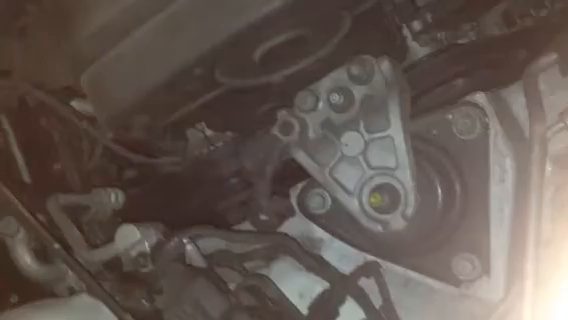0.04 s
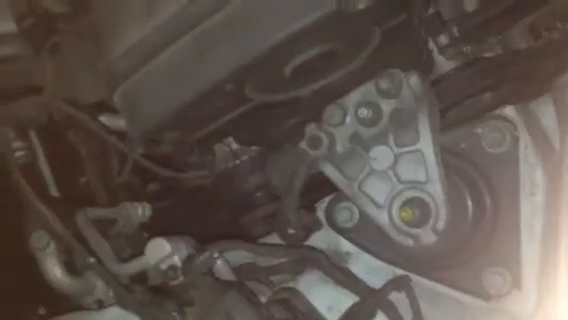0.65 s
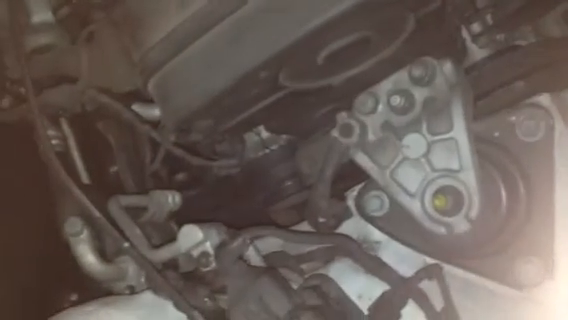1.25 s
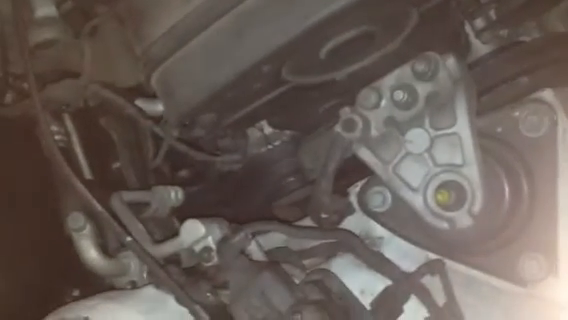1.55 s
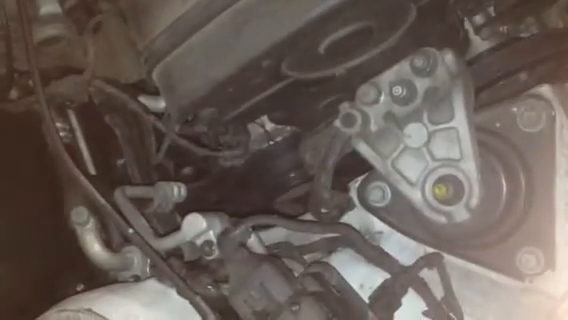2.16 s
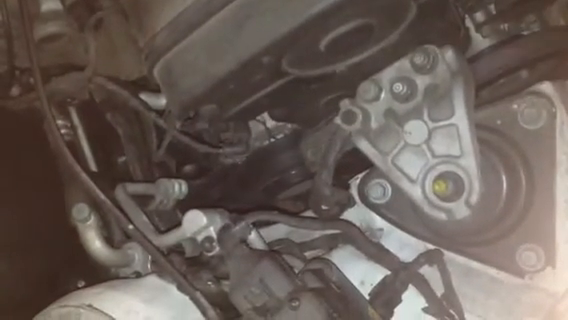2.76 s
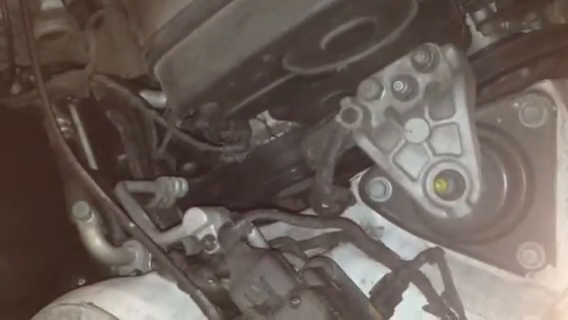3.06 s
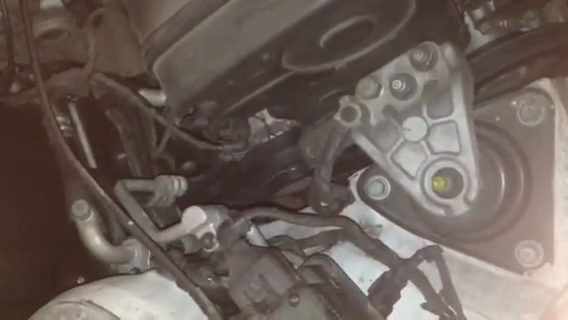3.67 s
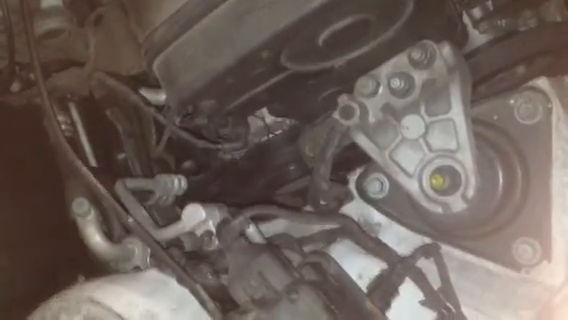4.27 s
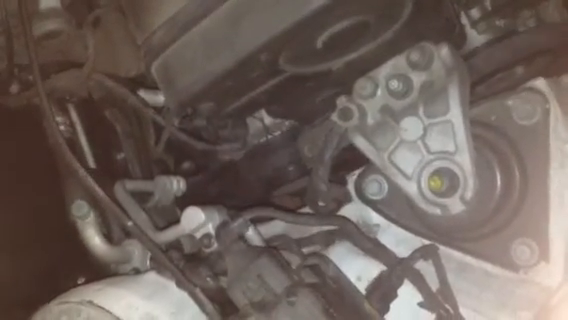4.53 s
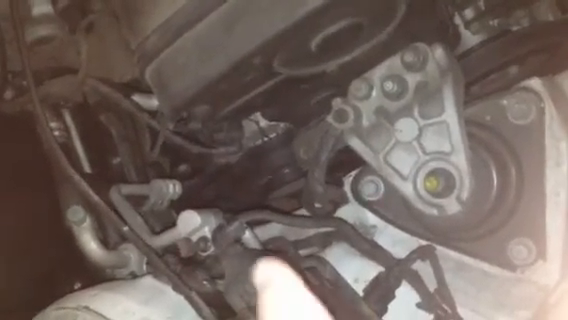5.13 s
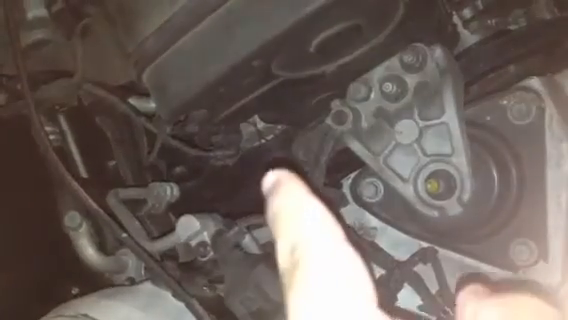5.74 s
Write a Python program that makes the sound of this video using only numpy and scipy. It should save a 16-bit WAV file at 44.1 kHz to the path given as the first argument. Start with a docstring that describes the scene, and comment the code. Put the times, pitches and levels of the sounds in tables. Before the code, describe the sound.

A four-cylinder petrol car engine idles for the whole six seconds, heard close up under an open bonnet. It makes a steady, airy rush with a low hum, light metallic knocking and quick, bright valve ticks. The speed stays even and there is little deep bass.

Above it, a drive belt slips on a pulley in very short, high chirps and squeaks, several a second at uneven intervals. Some are clean and fall in pitch; others are scratchy and sound almost like clicks. A quick cluster comes between about 0.2 and 0.5 seconds. Rougher, slightly lower squeaks recur near 1.0, 1.8, 2.7, 3.4, 4.3, 5.0 and 5.8 seconds. Quick double squeaks fall between them, around 1.3, 2.2, 2.9, 3.7, 4.5 and 5.3 seconds, with lighter chirps scattered among them. The close metal walls of the engine bay give each squeak a very short reflection.

```python
"""A drive belt slips on a pulley in short falling chirps, some clean, some harsh enough to tick.
Stick-slip friction makes each tone, and the close walls of the engine bay reflect it.
Beneath it a four-cylinder petrol engine idles under an open bonnet: belts and air rush as broadband
noise, the crank hums in harmonics of its rotation, piston blows ring the block and the valves tick."""
import sys
import numpy as np
from scipy import signal
from scipy.fft import rfft, irfft
from scipy.io import wavfile

SR = 44100
rng = np.random.default_rng(int(sys.argv[2]) if len(sys.argv) > 2 else 0)


def int16_out(signal):
    """Quantize to a 16-bit WAV file."""
    q = np.round(np.clip(np.atleast_2d(signal).T, -1, 1) * 32767)
    wavfile.write(sys.argv[1], SR, q.astype(np.int16))


N = 264600
BAND_LIMIT_HZ = 15400
BRIGHT_HZ = 2020  # snaps and rebounds grow purer as their pitch rises past this


def belt(level_db=-0.24):
    """Friction-excited vibration: four kinds of belt slip sound together with their reflections."""
    return amp(level_db) * bay(chirps() + whistles() + squeals() + squeaks())


def slip(length, first_hz, last_hz, rough, db, over_db,
         swell_db=0, half_db=-100, settle=2.61, rise_s=0.0013):
    """Stick-slip oscillation: rubber sticks and lets go at a rate that sinks as the belt grips again."""
    # radiation response of the pulley: (frequency [Hz], gain [dB])
    pulley = [(500, -21.5), (1100, -8.5), (2200, 3), (3400, 2), (4200, -1), (4900, 1), (6100, -1.5),
              (6800, 1.5), (7300, -3.5), (8600, -3.5), (9900, -14), (12500, -17.5), (15000, -22)]
    t = np.arange(4096) / SR
    hz = last_hz + (first_hz - last_hz) * np.exp(-settle * t / length)
    # each release comes a little early or late: the pitch holds while the high overtones smear
    jitter = (0.016 + 0.14 * rough) * drift(len(t), 890)
    cycles = np.cumsum(hz) / SR + jitter
    overtones = sum(gain_at(pulley, k * hz) * (k * hz < BAND_LIMIT_HZ) / np.sqrt(k)
                    * np.cos(2 * np.pi * k * cycles) for k in range(2, 9))
    # a harsh slip also scrapes, in one puff of noise a cycle
    puffs = 0.4 + np.exp(-(cycles % 1) / 0.55)
    scrape = colour(puffs * rng.standard_normal(len(t)), pulley)
    noise_share = np.clip(rough, 0, .95)
    treble = np.sqrt(1 - noise_share) * unit(overtones) + np.sqrt(noise_share) * unit(scrape)
    envelope = np.clip(t / rise_s, 0, 1) * np.exp(-np.maximum(t - length, 0) / 0.0015)
    flutter = amp(2.26 * drift(len(t), 370))
    # overtones start after the fundamental and fade before it
    bite = np.clip(t / (2.8 * rise_s), 0, 1) * amp(2.5 * (1.21 - np.minimum(t / length, 2)))
    # period doubling: strong and weak releases in turn add a tone at half the pitch
    tone = np.sqrt(2) * (np.sin(2 * np.pi * cycles) + amp(half_db) * np.sin(np.pi * cycles))
    level = amp(db + swell_db * np.minimum(t / length, 1))
    return level * envelope * flutter * (tone + amp(over_db) * bite * treble)


def squeals(snap_s=0.00688, fade_db_per_s=270):
    """Rough stick-slip: a low groan swells towards a diving snap or dies away after it."""
    # harsh slips: (snap time [s], landing pitch [Hz], snap level [dB], groan time [s], duration [s],
    # pitch [Hz], roughness [0-1], groan level at the snap end [dB])
    slips = [(0.333, 2045, -21.5, 0.341, 0.027, 1691, 0.32, -21.5),
             (1.038, 1756, -22, 1.046, 0.014, 1880, .35, -26),
             (1.854, 2855, -21, 1.825, .026, 1835, 0.29, -20.5),
             (2.718, 2244, -21.5, 2.692, 0.0236, 1790, 0.2, -21),
             (3.431, 1890, -26.5, 3.398, 0.028, 1860, 0.28, -23.5),
             (4.288, 1900, -23.5, 4.3, 0.0099, 1904, 0.49, -22),
             (5.01, 1707, -25, 5.018, 0.03, 1806, 0.32, -22.5),
             (5.804, 1658, -24, 5.815, 0.012, 1860, .55, -23)]
    out = np.zeros(N)
    for snap_at, snap_hz, snap_db, groan_at, length, hz, rough, db in slips:
        over_db = -17 * np.log2(snap_hz / BRIGHT_HZ)
        add(out, snap_at, slip(snap_s, 1.55 * snap_hz, snap_hz, rough=0.58, db=snap_db, over_db=over_db))
        swell_db = np.sign(snap_at - groan_at) * fade_db_per_s * length
        start_db = db - max(swell_db, 0)
        add(out, groan_at, slip(length, hz, .94 * hz, rough, start_db, over_db=-2, swell_db=swell_db))
    return out


def squeaks(rebound_s=0.0076):
    """Intermittent friction: the belt scrapes, grips, and lets go once more in a clean rebound."""
    # double slips: (time [s], duration [s], pitch [Hz], roughness [0-1], level [dB], subharmonic
    # re fundamental [dB], rebound time [s], rebound pitch [Hz], rebound level [dB])
    slips = [(0.501, 0.0051, 2590, 0.25, -26.5, -30, 0.511, 2730, -25.5),
             (1.304, .015, 2410, .45, -22, -30, 1.341, 2300, -23.5),
             (2.167, .012, 2475, 0.71, -24.5, -14, 2.189, 2696, -24),
             (2.886, .017, 2476, 0.56, -25.5, -5, 2.93, 2810, -24),
             (3.743, 0.0182, 2480, .58, -26, -15, 3.775, 2730, -27.5),
             (4.495, .018, 2433, 0.5, -21.5, -30, 4.539, 2203, -26),
             (5.261, .018, 2323, 0.46, -23, -30, 5.298, 2333, -23.5)]
    out = np.zeros(N)
    for at, length, hz, rough, db, half_db, rebound_at, rebound_hz, rebound_db in slips:
        over_db = -9.5 + 14 * rough  # rougher scrapes are brighter
        add(out, at, slip(length, hz, .91 * hz, rough, db, over_db, half_db=half_db))
        over_db = 5.5 - 25 * np.log2(rebound_hz / BRIGHT_HZ)
        rebound = slip(rebound_s, rebound_hz, .86 * rebound_hz, rough=0.16, db=rebound_db, over_db=over_db)
        add(out, rebound_at, rebound)
    return out


def chirps():
    """Nearly periodic stick-slip: a clean tone falls as the belt regains its grip."""
    # light slips: (time [s], duration [s], starting pitch [Hz], level [dB])
    slips = [(0.202, .033, 2900, -27.5), (0.364, .0125, 3740, -25.5), (0.87, .026, 3090, -24.3),
             (1.503, .027, 3950, -39), (1.673, .016, 3326, -26.5), (2.56, .014, 2660, -31),
             (3.254, .014, 3084, -26.7), (4.143, .015, 2560, -32.5), (4.873, 0.02, 2890, -27),
             (5.553, .01, 3380, -32.5), (5.634, .012, 3510, -25.5)]
    return glides(slips, pitch_ratio=.73, rough=0.25, over_db=-7.5)


def whistles():
    """Nearly steady stick-slip: the belt barely slides, so the pitch almost holds."""
    # slight slips: (time [s], duration [s], starting pitch [Hz], level [dB])
    slips = [(0.449, 0.0075, 2870, -28), (0.519, 0.011, 2695, -25), (1.979, .035, 3520, -37),
             (2.033, 0.0195, 2950, -26.5), (3.552, 0.032, 2946, -30), (5.15, .017, 2930, -37),
             (5.462, 0.0077, 3890, -40)]
    return glides(slips, pitch_ratio=.93, rough=.2, over_db=-6.5)


def glides(slips, pitch_ratio, rough, over_db):
    """Exponential relaxation: each soft slip sinks towards the same fraction of its starting pitch."""
    out = np.zeros(N)
    for at, length, hz, db in slips:
        add(out, at, slip(length, hz, pitch_ratio * hz, rough, db, over_db, settle=1.9, rise_s=0.0017))
    return out


def bay(x, wet_db=-5.0, t60=0.16, treble_t60=0.056, first_s=0.0018, crossover_hz=4500):
    """Reverberation: close metal walls return short, dense reflections whose treble dies first."""
    t = np.arange(6000) / SR
    taps = rng.choice([-1., 1.], len(t)) * (rng.random(len(t)) < .15) * (t > first_s)
    low = signal.sosfilt(signal.butter(2, crossover_hz, fs=SR, output="sos"), taps)
    high = signal.sosfilt(signal.butter(2, crossover_hz, "high", fs=SR, output="sos"), taps)
    decay = amp(-60 * t / t60)
    tail = (low * decay - high * amp(-60 * t / treble_t60)) / np.linalg.norm(taps * decay)
    return x + amp(wet_db) * signal.fftconvolve(x, tail)[:N]


def rush(turns, level_db=-35.0, throb_db=-0.37, flutter_db=-0.5):
    """Amplitude-modulated noise: belts and intake air rush steadily and throb once a crank turn."""
    # noise spectrum: (frequency [Hz], relative level [dB])
    spectrum = [(30, -45), (70, -29), (105, -23), (140, -5), (250, -5.5), (400, -4.5), (550, -4),
                (750, -1.5), (1500, -0.5), (2800, -1.5), (4600, -5), (5300, -8.5), (7300, -9), (9500, -17),
                (10700, -19), (12500, -24), (15000, -23)]
    swell_db = throb_db * np.cos(2 * np.pi * (turns - 0.13)) + flutter_db * drift(N, 130)
    return amp(level_db) * unit(colour(amp(swell_db) * rng.standard_normal(N), spectrum))


def hum(turns, waver=0.17, wobble_turns=0.0031):
    """Harmonics of rotation: the crank runs a little unevenly, and phase modulation blurs high orders."""
    # crank orders: (frequency [multiple of crank speed], level [dB])
    orders = [(6.0, -75), (8.0, -62.5), (10.0, -56.5), (12.0, -55), (15.0, -57), (16.0, -57), (17.0, -57),
              (18.0, -42.5), (19.0, -56), (21.0, -51.5), (23.0, -54), (27.0, -55.5), (29.0, -59),
              (45.0, -52.5), (49.0, -50.5), (52.0, -56.5), (68.0, -51)]
    angle = turns + wobble_turns * drift(N, 11.0)
    out = np.zeros(N)
    for order, db in orders:
        amplitude = np.sqrt(2) * amp(db) * (1 + waver * drift(N, 8.4))
        out += amplitude * np.sin(2 * np.pi * (order * angle + rng.random()))
    return out


def knock(turns, level_db=-42):
    """Modal resonance: piston blows ring the block and its covers."""
    # piston blows in one four-stroke cycle: (crank angle [turns], relative level [dB])
    impacts = [(.1, -1.5), (0.582, -4.5), (.85, -4), (1.078, -2), (1.61, -5), (1.851, -5)]
    # modes of the block and covers: (frequency [Hz], bandwidth [Hz], relative gain [dB])
    modes = [(682, 63, -8.5), (752, 110, 0.5), (1025, 40, -6), (1263, 100, 1), (1540, 36, -4),
             (2220, 200, -2.5), (2639, 46, 6.5), (2870, 120, -30), (4220, 240, -5.5)]
    force = blows(turns, impacts, rise_turns=0.008, fall_turns=0.094) * rng.standard_normal(N)
    ring = sum(amp(db) * signal.lfilter(*signal.iirpeak(hz, hz / width, SR), force)
               for hz, width, db in modes)
    return amp(level_db) * unit(ring)


def valves(turns, level_db=-46):
    """Impact noise: each valve seats with a short, bright tick."""
    # valve closures in one four-stroke cycle: (crank angle [turns], relative level [dB])
    impacts = [(.02, -5), (.19, -18), (.42, 0.5), (.68, -10), (.91, -2.5), (1.17, -10), (1.45, -4.5),
               (1.65, -17), (1.895, -1)]
    # spectrum of a tick: (frequency [Hz], relative level [dB])
    spectrum = [(300, -32), (2000, 5.5), (4500, -3.5), (7500, 5), (9000, -7), (10500, -3.5), (13000, -5),
                (15000, -7.5)]
    envelope = blows(turns, impacts, rise_turns=.03, fall_turns=.06)
    return amp(level_db) * unit(colour(envelope * rng.standard_normal(N), spectrum))


def blows(turns, impacts, rise_turns, fall_turns):
    """Incoherent sum: impacts recurring every two crank turns add in power to form one envelope."""
    power = np.zeros(N)
    for at, db in impacts:
        cycle, age = np.divmod(turns - at + 4, 2)
        strength = amp(db + rng.standard_normal(128))[cycle.astype(int)]
        power += (strength * (1 - np.exp(-age / rise_turns)) * np.exp(-age / fall_turns)) ** 2
    return np.sqrt(power)


def amp(db):
    """Amplitude ratio of a level in decibels."""
    return 10 ** (np.asarray(db) / 20)


def unit(x):
    """Normalisation to rms 1."""
    return x / np.sqrt(np.mean(x ** 2) + 1e-20)


def gain_at(response, hz):
    """Gain of a frequency response, interpolated on a log-frequency axis."""
    f, db = np.transpose(response)
    return amp(np.interp(np.log(hz + 1), np.log(f), db))


def colour(x, response):
    """Linear filtering: the spectrum of x is multiplied by a frequency response."""
    return irfft(rfft(x) * gain_at(response, np.fft.rfftfreq(len(x), 1 / SR)), len(x))


def drift(size, rate_hz):
    """Low-pass noise: smooth random motion of rms 1."""
    hz = np.fft.rfftfreq(size, 1 / SR)
    return unit(irfft(rfft(rng.standard_normal(size)) * np.exp(-(hz / rate_hz) ** 2), size))


def add(mix, at, sound):
    """Superposition of a sound on the mix, starting at a time in seconds."""
    part = mix[round(at * SR):][:len(sound)]
    part += sound[:len(part)]


def scene():
    """Phase locking: the crank angle times every engine layer; the belt slips above them."""
    # idle speed: (time [s], crank speed [rpm])
    speed = [(0.0, 923), (1.6, 910), (2.4, 913.7), (3.7, 908), (4.6, 905.6), (6.0, 904)]
    rpm = np.interp(np.arange(N) / SR, *np.transpose(speed))
    turns = np.cumsum(rpm) / 60 / SR
    return (hum(turns) + knock(turns) + valves(turns) + rush(turns) + belt())[None]


def record(dry, start_s=.1215):
    """Band limiting: a small microphone, deaf to deep bass and top treble, opens after a moment."""
    thin = signal.sosfilt(signal.butter(2, 60, "high", fs=SR, output="sos"), dry)
    gate = np.clip((np.arange(N) / SR - start_s) / .0012, .002, 1)
    lowpass = signal.firwin(701, BAND_LIMIT_HZ, window=("kaiser", 9), fs=SR)
    return signal.oaconvolve(thin * gate, lowpass[None], "same")


dry = scene()
out = record(dry)
int16_out(out)
```